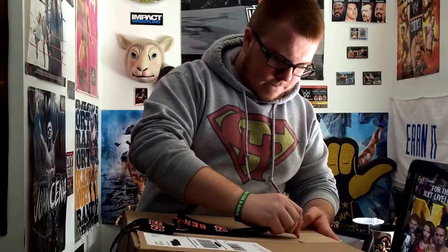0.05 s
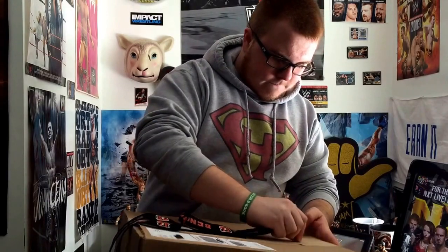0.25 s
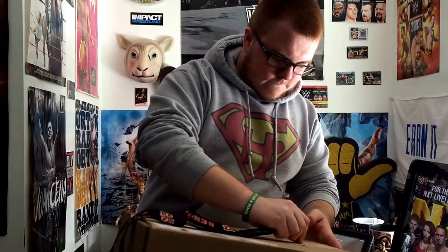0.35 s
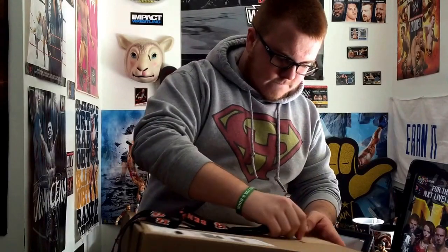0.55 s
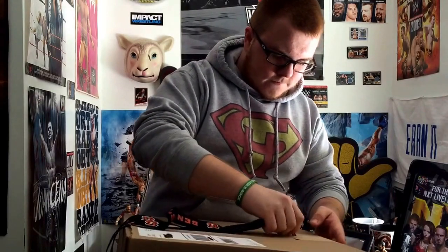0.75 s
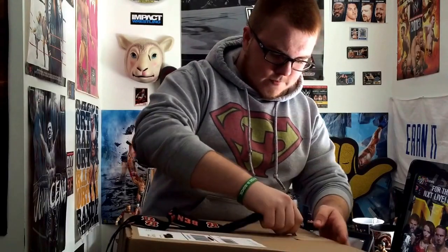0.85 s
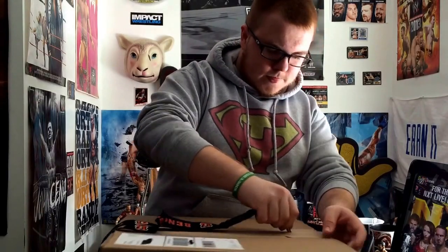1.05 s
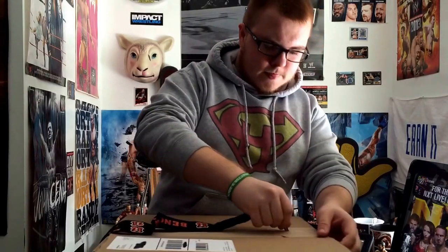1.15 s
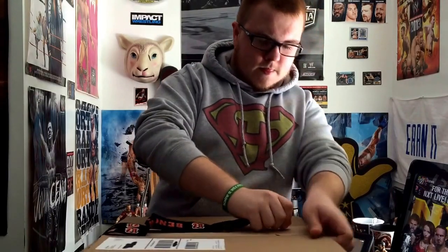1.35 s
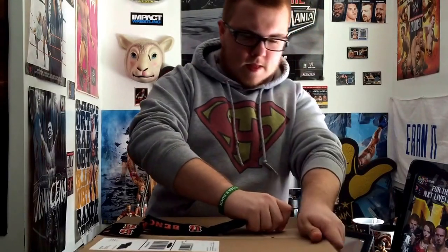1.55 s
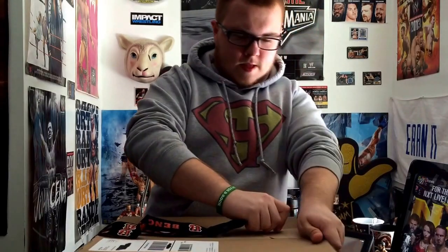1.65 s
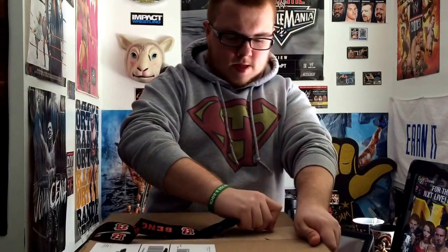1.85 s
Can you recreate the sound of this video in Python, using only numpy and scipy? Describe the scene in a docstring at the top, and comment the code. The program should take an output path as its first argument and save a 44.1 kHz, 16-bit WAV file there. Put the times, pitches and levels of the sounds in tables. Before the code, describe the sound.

A cardboard box buckles and its tape snaps loudly, then soft rubbing and a dull knock

```python
"""A cardboard box under the hands, in a small room: the lid buckles, its tape snaps, a dull knock follows.
Each blow is a filtered thud, a clack of random ticks, ringing modes and a tape crack with splinters and fizz.
Lighter picks of fingernails use the same sources; soft bumps of the lid are low damped modes.
Hands and sleeves rub the board as grainy, patchy noise; the crushing flutes crunch in the same way.
Coloured noise is the quiet air; a decaying noise tail is the room, and a near wall repeats the tape."""
import sys
import numpy as np
from scipy import signal
from scipy.fft import rfft, irfft, next_fast_len
from scipy.io import wavfile
from scipy.ndimage import uniform_filter1d

SR = 44100
rng = np.random.default_rng(int(sys.argv[2]) if len(sys.argv) > 2 else 0)


def generate_wav(sig):
    """Save sig (samples, or channels by samples) to the path in sys.argv[1] as 16-bit PCM at SR."""
    pcm = np.round(np.clip(np.atleast_2d(sig).T, -1, 1) * 32767).astype(np.int16)
    wavfile.write(sys.argv[1], SR, pcm)


N = 83790
T = np.arange(SR // 2) / SR  # time axis of one event, s

# Spectrum of the quiet air: f/Hz, relative level/dB
AIR_SPECTRUM = [(25, -8.5), (90, 18.5), (150, 2), (300, 13), (500, 4.5), (1500, 0.5), (3000, -1),
                (8000, -9), (15000, -15)]
# Decay of the small room: f/Hz, t60/s
ROOM_DECAY = [(80, 0.35), (250, 0.5), (600, 0.38), (1500, 0.38), (2600, 0.26), (6000, 0.2), (14000, 0.4)]
# Contact sound sent into the room tail: f/Hz, level/dB
ROOM_SEND_SPECTRUM = [(60, -11.5), (150, -5.5), (300, -15.5), (450, -12.5), (600, -8.5), (1500, -4.5),
                      (5000, -3.5), (12000, -7)]
# Strokes of sleeves, of scraping hands and of dragging hands: peak t/s, rise/s, fall/s, level/dB
SLEEVE_STROKES = [(.675, 0.011, 0.012, -65), (.872, 0.034, 0.027, -61), (.97, 0.092, 0.048, -63.5),
                  (1.17, 0.082, 0.057, -63.5), (1.28, 0.029, 0.012, -64.5), (1.53, 0.39, 0.14, -71.5),
                  (1.7, 0.009, 0.017, -68)]
SCRAPE_STROKES = [(.196, 0.02, 0.0073, -51.5), (.11, 0.073, 0.14, -69), (.66, 0.057, 0.039, -63),
                  (1.0, 0.13, 0.04, -66.5), (1.49, .09, 0.075, -58.5), (1.59, 0.11, 0.058, -62.5),
                  (1.89, 0.21, 0.045, -70)]
DRAG_STROKES = [(.49, 0.0099, .015, -57), (.525, 0.023, 0.026, -54.5), (.935, 0.042, 0.027, -57.5),
                (1.01, 0.069, 0.14, -54), (1.245, 0.0083, 0.031, -54), (1.33, 0.019, 0.062, -58.5),
                (1.395, 0.018, 0.063, -55), (1.56, 0.078, 0.14, -64.5), (1.85, 0.034, 0.043, -62.5)]
# The flutes of the board crush under the knock: peak t/s, rise/s, fall/s, level/dB
CRUNCH_STROKES = [(1.092, 0.0083, 0.011, -37)]
# Spectra of these frictions: f/Hz, relative level/dB
SLEEVE_SPECTRUM = [(500, -1), (2500, 2), (5000, -1.5), (10000, 1), (13000, 3), (15000, 0)]
SCRAPE_SPECTRUM = [(200, -6), (600, -8.5), (1000, -10), (1600, -6), (2200, -8), (3000, -15), (5000, -14.5),
                   (9000, -20), (15000, -27.5)]
DRAG_SPECTRUM = [(50, -28.5), (130, -10), (205, 2), (240, -3), (300, 3.5), (390, -6), (460, -14.5),
                 (700, -15.5), (1200, -21), (2500, -46), (8000, -54)]
CRUNCH_SPECTRUM = [(60, -48), (200, -21.5), (600, 21), (1100, 0.5), (1700, -7), (2200, 12), (2700, -9),
                   (3400, -2), (4300, -10), (5200, -24), (12000, -38)]
# Modes of the lid, the hollow box and the stiff board: f/Hz, relative level/dB, t60/s
LID_MODES = [(65, 3.5, 0.25), (99.7, 15, 0.1), (128.2, 1.5, .14)]
BOX_MODES = [(206, -3, .36), (280.6, 5.5, 0.21), (318, -3.5, 0.18), (331.8, -3.5, 0.29), (387.2, 1, 0.23)]
BOARD_MODES = [(531.4, -1, 0.14), (592, -8.5, 0.15), (627, -3, .2), (781.4, 1, 0.15), (974, -3, 0.23),
               (1112, 2, 0.18), (1168.6, -1.5, 0.19), (1216, -6, .2), (1378, -1.5, 0.17), (1423, -2, 0.13),
               (1507, 3, .13), (1620, -3.5, 0.2), (1725, -6, 0.22), (2530, -11, .12)]
# Spectra of a push on the box wall, the board's clack, the tape's crack and its fizz:
# f/Hz, relative level/dB
THUD_SPECTRUM = [(50, -37.5), (130, -19.5), (175, -4), (210, 2), (280, -3), (340, -3.5), (400, 3),
                 (450, -16.5), (600, -22), (1500, -55), (4000, -81.5)]
CLACK_SPECTRUM = [(100, -31), (220, -11.5), (390, 0), (455, -5.5), (550, 0), (790, 0), (890, -1.5),
                  (1150, -0.5), (1500, -4.5), (1830, -6), (2020, -14), (2300, -14.5), (2600, -9),
                  (3500, -8.5), (8000, -48)]
CRACK_SPECTRUM = [(60, -70.5), (400, 3), (1500, -22), (2500, -2.5), (3000, -31.5), (3500, -4), (4500, -2.5),
                  (5600, -6.5), (6600, -4.5), (7400, -16.5), (9000, -12), (15000, -24)]
FIZZ_SPECTRUM = [(200, -69), (1500, -18), (3500, -6.5), (4600, -2), (5400, -4.5), (7200, -3), (8700, 1),
                 (10300, -7.5), (11600, -3), (13300, -7.5), (15000, -9)]
# The lid flexes under the hands: t/s, level/dB
LID_FLEXES = [(0.203, -29.5), (0.228, -34), (0.286, -39), (.515, -63.5), (0.685, -57.5), (1.406, -51),
              (1.449, -56), (1.493, -57), (1.619, -55), (1.696, -57.5), (1.811, -52)]
# Nail picks and light touches: t/s, thud level/dB, board level/dB before the trims below,
# crack level/dB, fizz level/dB, length of the slip/s
NAIL_PICKS = [(0.1959, -68, -42.5, -50, -40, .002), (0.229, -31, -51, -68.5, -68, 0.0039),
              (0.571, -61, -61.5, -56.5, -57, .015), (0.617, -61, -58.5, -82, -56, .016),
              (0.6704, -49.5, -58, -60.5, -73, 0.015), (0.758, -55.5, -56, -47, -58.5, 0.009),
              (1.067, -62, -58, -82, -84.5, .004), (1.0987, -51.5, -37.5, -59.5, -71, 0.0032),
              (1.122, -78, -46, -57, -74, 0.0073), (1.22, -48, -58.5, -67.5, -80, 0.013),
              (1.5846, -72.5, -64.5, -54.5, -56.5, 0.001), (1.802, -61.5, -64.5, -60.5, -63, 0.015),
              (1.882, -80, -59.5, -67, -84.5, 0.0085)]
# Loud blows: t/s, thud level/dB, thud dull above f/Hz, board level/dB before the trims below,
# board dull above f/Hz, crack level/dB, crack dull above f/Hz, splinter peak over the snap/dB, fizz level/dB
LOUD_BLOWS = [(0.1994, -20, 290, -29, 1630, -36.5, 9000, -6, -46),
              (0.2715, -16.5, 520, -20, 2220, -19.5, 7000, -12, -45),
              (1.0898, -37, 500, -40.5, 1050, -56, 2900, 0, -64)]

AIR_DB = -68
CLACK_TRIM_DB, BOARD_RING_TRIM_DB = 2.5, -5  # both on the board level
BOX_RING_TRIM_DB = -6.5  # on the thud level
CLACK_T60_S, FIZZ_T60_S, SPLINTER_T60_S = 0.048, 0.07, 0.01
THUD_LAG_S = 0.0024  # the box wall moves just after the contact
BLOW_RISE_S, TOUCH_RISE_S, FLEX_RISE_S = 0.0021, 0.00035, 0.012
TOUCH_THUD_HZ, TOUCH_BOARD_HZ, TOUCH_TAPE_HZ = 420, 1430, 11000  # dull above these
WALL_DELAY_S, WALL_DB = 0.0066, -9  # a path about 2.3 m longer than the direct one
LOW_CUT_HZ, TOP_HZ = 34, 15500


def amp(db):
    """Amplitude of a level in dB."""
    return 10 ** (np.asarray(db) / 20)


def unit(x):
    """Scale to rms 1."""
    return x / np.sqrt(np.mean(x ** 2) + 1e-20)


def burst(x, seconds):
    """Scale to the energy of an rms-1 sound of that length."""
    return unit(x) * np.sqrt(seconds * SR / len(x))


def fade(t60):
    """Exponential decay by 60 dB in t60 seconds."""
    return np.exp(-np.log(1000) * T / t60)


def swell(rise):
    """Exponential approach to full level."""
    return 1 - np.exp(-T / rise)


def along(points, hz):
    """Interpolate (f, value) points on a log frequency axis."""
    f, value = np.transpose(points)
    return np.interp(np.log(hz + 1), np.log(f + 1), value)


def colour(x, spectrum):
    """Causal minimum-phase filter with the given spectrum."""
    gain = amp(along(spectrum, np.fft.rfftfreq(2 ** 12, 1 / SR)))
    # Folding the cepstrum onto positive time makes the filter causal.
    cepstrum = irfft(np.log(gain))
    half = len(cepstrum) // 2
    cepstrum[1:half] *= 2
    cepstrum[half + 1:] = 0
    response = irfft(np.exp(rfft(cepstrum)))
    return signal.fftconvolve(x, response)[:len(x)]


def dull(x, hz):
    """A softer contact loses its treble through a low-pass."""
    return signal.lfilter(*signal.butter(2, min(hz, SR / 3), fs=SR), x)


def add(track, s, x):
    """Mix x into the track at time s."""
    part = track[..., round(s * SR):][..., :len(T)]
    part += x[..., :part.shape[-1]]


def air():
    """Quiet air of the place: steady coloured noise."""
    return amp(AIR_DB) * unit(colour(rng.standard_normal(N), AIR_SPECTRUM))


def room(x):
    """The small room's tail builds quickly, then each band of noise decays at its own rate."""
    hz, t, z = signal.stft(rng.standard_normal(len(T)), SR, nperseg=256)
    decay = np.exp(-np.log(1000) * t / along(ROOM_DECAY, hz)[:, None])
    tail = signal.istft(z * decay, SR, nperseg=256)[1][:len(T)]
    tail *= 1 - np.exp(-(T / 0.0033) ** 2)
    return signal.fftconvolve(x, tail / np.linalg.norm(tail))[:N]


def near_wall(direct):
    """A near wall returns one later, weaker copy."""
    echo = np.pad(direct, (round(WALL_DELAY_S * SR), 0))[:len(T)]
    return direct + amp(WALL_DB) * echo


def rub(strokes, spectrum, rough_db, patchy_db):
    """Grainy friction of shifting colour that swells and fades with each stroke."""
    t = np.arange(N) / SR
    power = np.zeros(N)
    for s, rise, fall, db in strokes:
        width = np.where(t < s, rise, fall)
        power += amp(db) ** 2 * np.exp(-2 * ((t - s) / width) ** 2)
    # Fast random level steps make the grain.
    grain = amp(rough_db * unit(uniform_filter1d(rng.standard_normal(N), size=40)))
    z = signal.stft(grain * rng.standard_normal(N), nperseg=512)[2]
    # Smooth patches in frequency and time make the colour shift.
    patches = uniform_filter1d(rng.standard_normal(z.shape), size=4, axis=0)
    patches = uniform_filter1d(patches, size=6, axis=1)
    friction = signal.istft(z * amp(patchy_db * unit(patches)), nperseg=512)[1][:N]
    return np.sqrt(power) * unit(colour(friction, spectrum))


def rubbing():
    """Hands and sleeves pass over the cardboard."""
    sleeves = rub(SLEEVE_STROKES, SLEEVE_SPECTRUM, rough_db=-0.5, patchy_db=1.5)
    scrapes = rub(SCRAPE_STROKES, SCRAPE_SPECTRUM, rough_db=0.5, patchy_db=3.5)
    drags = rub(DRAG_STROKES, DRAG_SPECTRUM, rough_db=4, patchy_db=2.0)
    return sleeves + scrapes + drags


def ring(modes, scatter_db):
    """Damped sine modes, their levels a little different at each contact."""
    total = np.zeros(len(T))
    for hz, db, t60 in modes:
        level = amp(db + scatter_db * rng.standard_normal())
        total += level * fade(t60) * np.sin(2 * np.pi * hz * T)
    return total


def ticks(rate):
    """Sparse tiny fractures of random size, at a mean rate per second."""
    return rng.standard_normal(len(T)) * (rng.random(len(T)) < rate / SR)


def flexes():
    """Soft low bumps as the lid's modes swell and die."""
    out = np.zeros(N)
    for s, db in LID_FLEXES:
        bump = ring(LID_MODES, scatter_db=0.5) * swell(FLEX_RISE_S)
        add(out, s, amp(db) * burst(bump, 0.015))
    return out


def crunch():
    """The flutes crush under the knock with a rough, patchy friction."""
    return rub(CRUNCH_STROKES, CRUNCH_SPECTRUM, rough_db=4, patchy_db=4.5)


def cardboard(thud_db, thud_hz, board_db, board_hz, rise):
    """Two rows: the short thud and clack of a contact, and the ringing of box and board after it."""
    onset = swell(rise)
    push = signal.unit_impulse(len(T), round(THUD_LAG_S * SR))
    thud = burst(dull(colour(push, THUD_SPECTRUM), thud_hz), 0.0049)
    clack = burst(colour(ticks(12000) * fade(CLACK_T60_S), CLACK_SPECTRUM), 0.013)
    clack = dull(onset * clack, board_hz)
    box = burst(onset * ring(BOX_MODES, scatter_db=0.5), 0.015)
    board = burst(ring(BOARD_MODES, scatter_db=0.8), 0.024)
    board = dull(onset * board, board_hz)
    contact = amp(thud_db) * thud + amp(board_db + CLACK_TRIM_DB) * clack
    ringing = amp(thud_db + BOX_RING_TRIM_DB) * box + amp(board_db + BOARD_RING_TRIM_DB) * board
    return np.array([contact, ringing])


def tape(crack_db, fizz_db, splinters, dull_hz):
    """One sharp snap, its splinters and the fizz of glue letting go; a near wall repeats it."""
    snap = signal.unit_impulse(len(T))
    crack = dull(burst(colour(snap + splinters, CRACK_SPECTRUM), 0.0035), dull_hz)
    fizz = burst(colour(ticks(7000) * fade(FIZZ_T60_S), FIZZ_SPECTRUM), 0.0049)
    return near_wall(amp(crack_db) * crack + amp(fizz_db) * fizz)


def picks():
    """A nail catches the tape's edge and slips off in a short run of ticks: contacts and ringing."""
    out = np.zeros((2, N))
    for s, thud_db, board_db, crack_db, fizz_db, length in NAIL_PICKS:
        slips = ticks(1100) * np.exp(-(T / length) ** 2)
        slips *= 3.9 / (np.abs(slips).max() + 1e-12)  # peak relative to the snap
        add(out, s, cardboard(thud_db, TOUCH_THUD_HZ, board_db, TOUCH_BOARD_HZ, TOUCH_RISE_S))
        add(out[0], s, tape(crack_db, fizz_db, slips, TOUCH_TAPE_HZ))
    return out


def blows():
    """The lid buckles, the tape bursts, the box is knocked: contacts and ringing."""
    out = np.zeros((2, N))
    for (s, thud_db, thud_hz, board_db, board_hz,
         crack_db, tape_hz, splinter_db, fizz_db) in LOUD_BLOWS:
        splinters = ticks(5000) * fade(SPLINTER_T60_S)
        splinters *= amp(splinter_db) / np.abs(splinters).max()
        add(out, s, cardboard(thud_db, thud_hz, board_db, board_hz, BLOW_RISE_S))
        add(out[0], s, tape(crack_db, fizz_db, splinters, tape_hz))
    return out


def scene():
    """Handling noises over the quiet air; only contacts and crunch feed the room tail."""
    contact, ringing = blows() + picks()
    contact = contact + crunch()
    reverb = colour(room(contact), ROOM_SEND_SPECTRUM)
    mix = air() + reverb + rubbing() + flexes() + ringing + contact
    return mix[None]  # one channel


def record(dry):
    """The microphone thins the deepest bass and keeps nothing above its band limit."""
    dry = signal.lfilter(*signal.butter(2, LOW_CUT_HZ, "highpass", fs=SR), dry)
    m = next_fast_len(N + SR // 2)
    passed = np.fft.rfftfreq(m, 1 / SR) < TOP_HZ
    return irfft(rfft(dry, m) * passed, m)[:, :N]


dry = scene()
out = record(dry)
generate_wav(out)
```